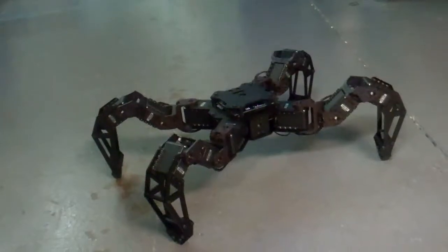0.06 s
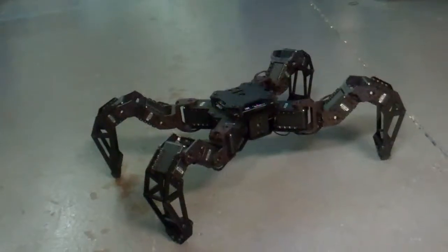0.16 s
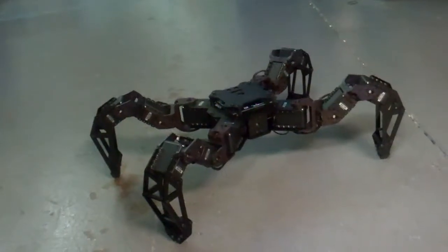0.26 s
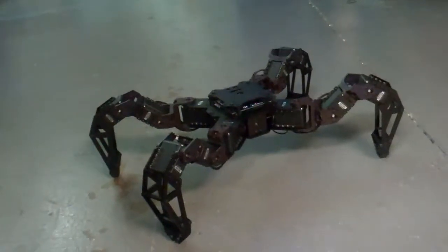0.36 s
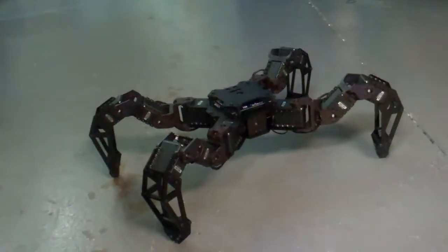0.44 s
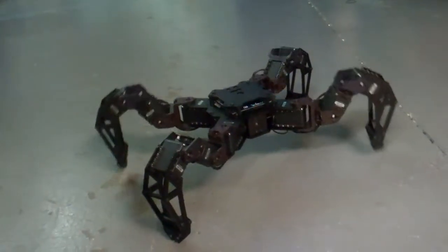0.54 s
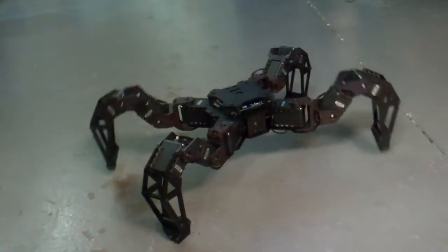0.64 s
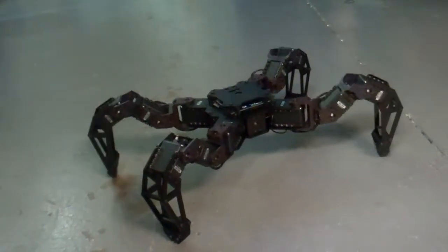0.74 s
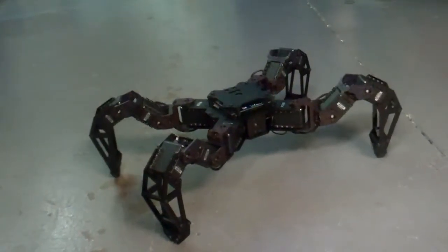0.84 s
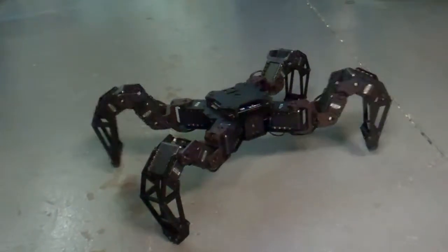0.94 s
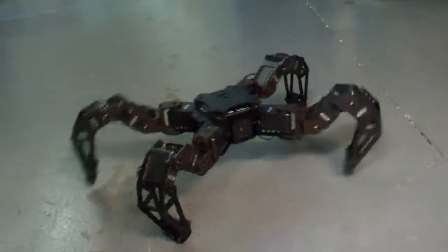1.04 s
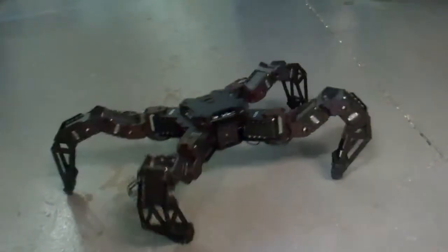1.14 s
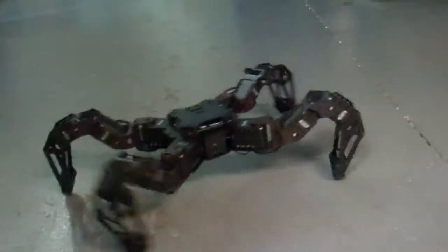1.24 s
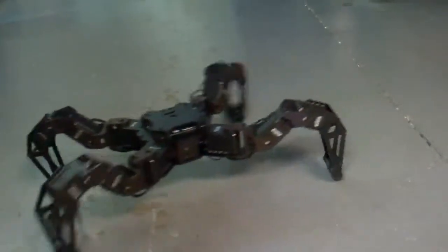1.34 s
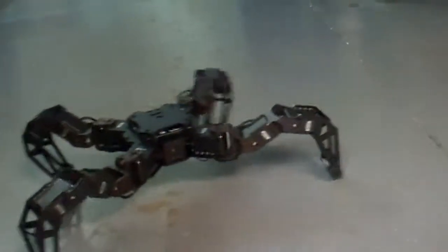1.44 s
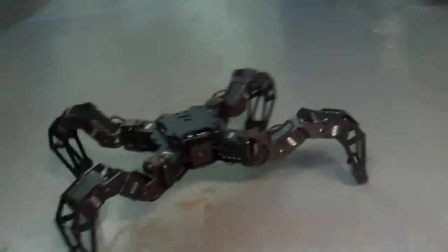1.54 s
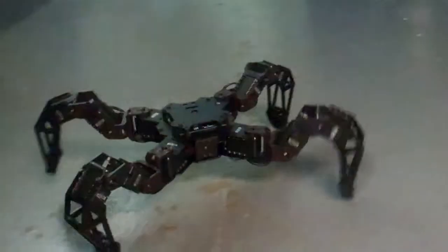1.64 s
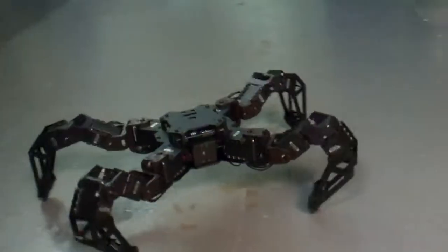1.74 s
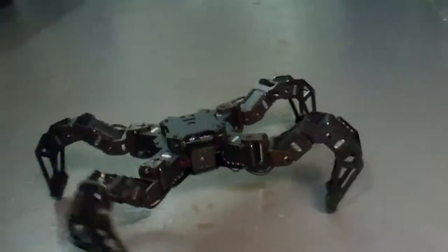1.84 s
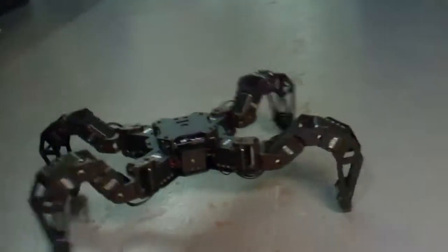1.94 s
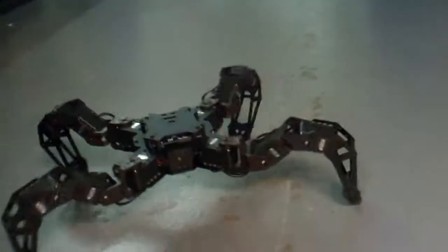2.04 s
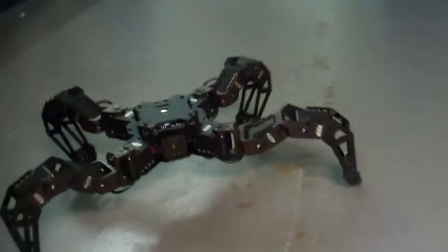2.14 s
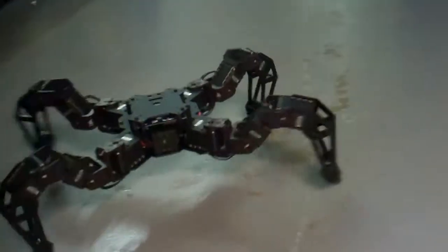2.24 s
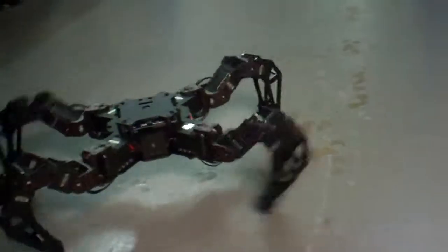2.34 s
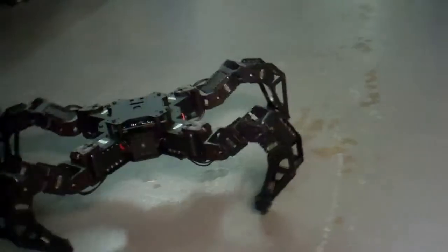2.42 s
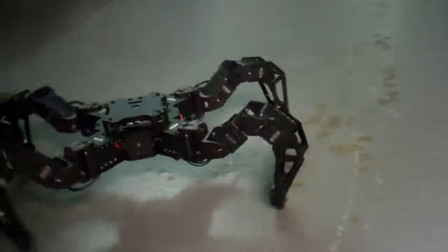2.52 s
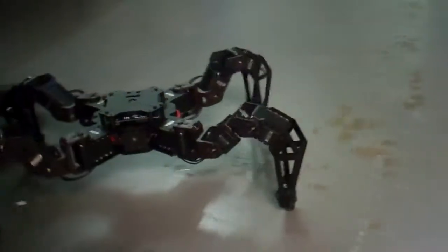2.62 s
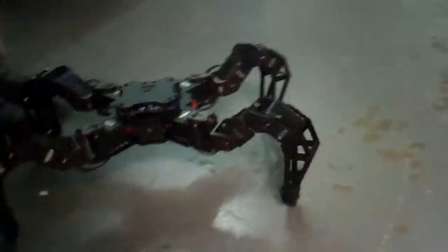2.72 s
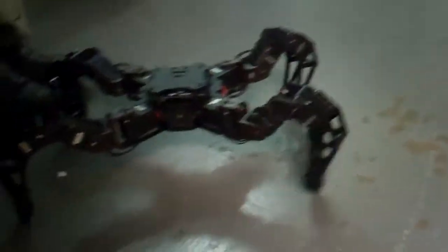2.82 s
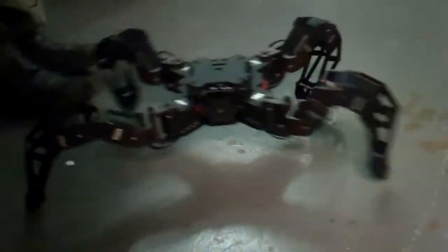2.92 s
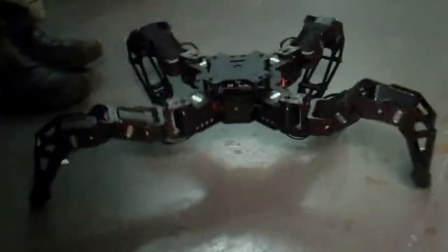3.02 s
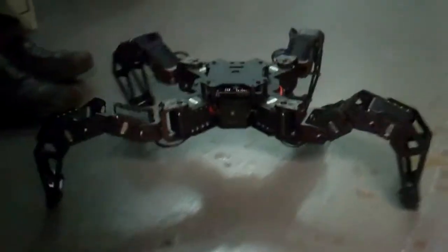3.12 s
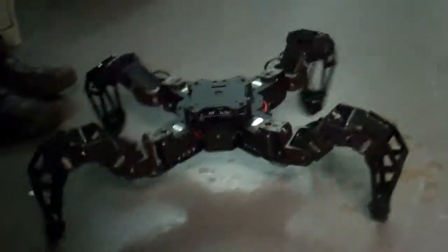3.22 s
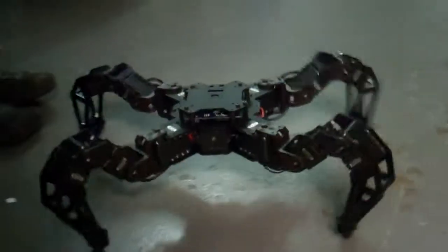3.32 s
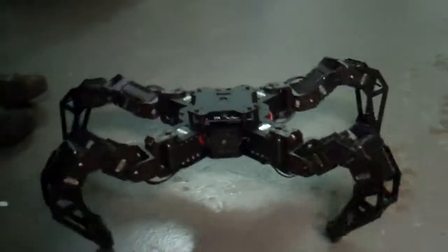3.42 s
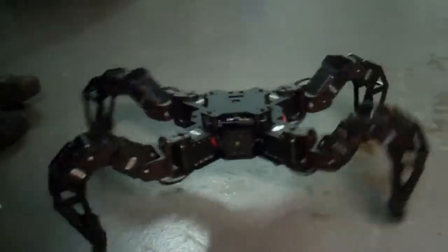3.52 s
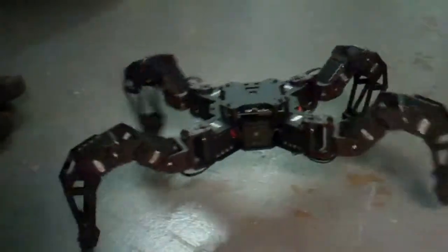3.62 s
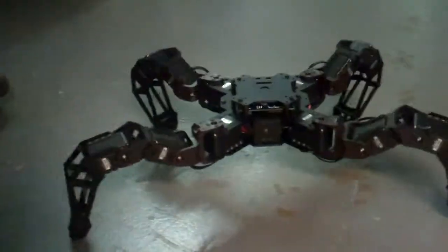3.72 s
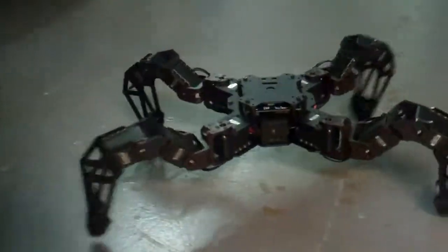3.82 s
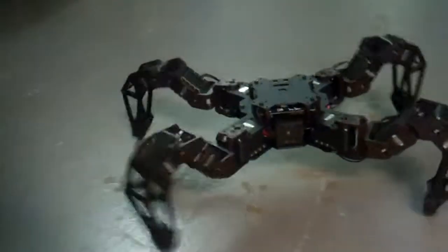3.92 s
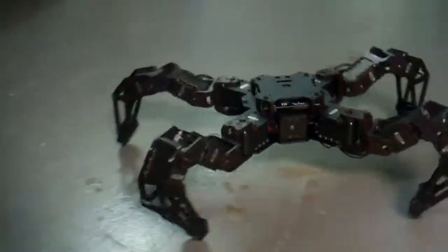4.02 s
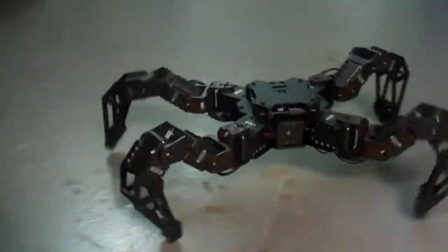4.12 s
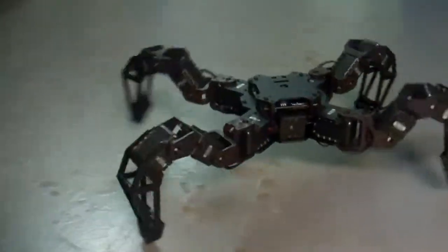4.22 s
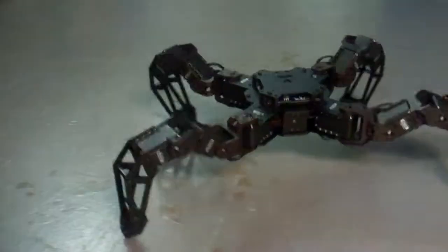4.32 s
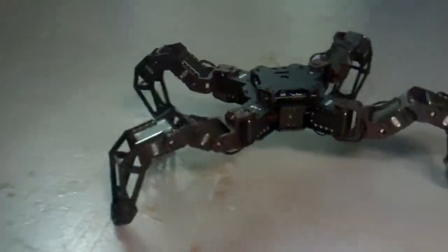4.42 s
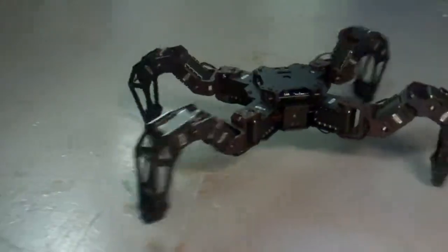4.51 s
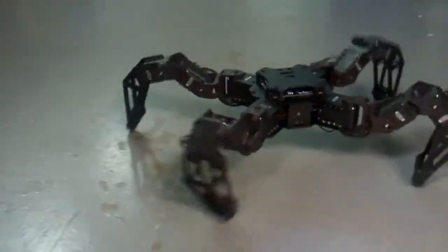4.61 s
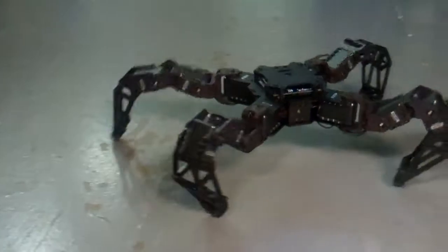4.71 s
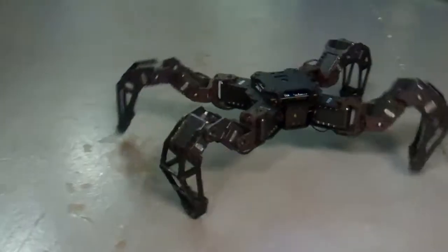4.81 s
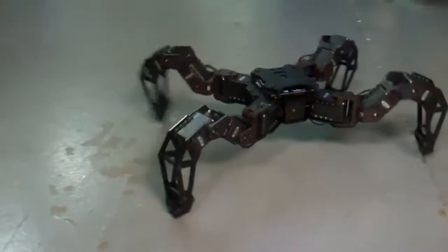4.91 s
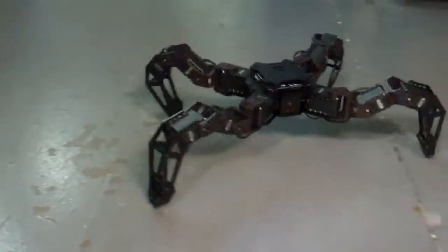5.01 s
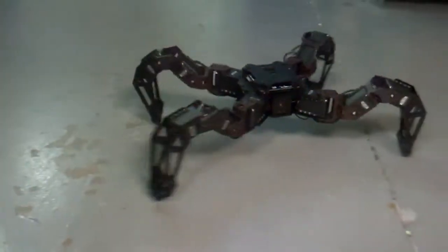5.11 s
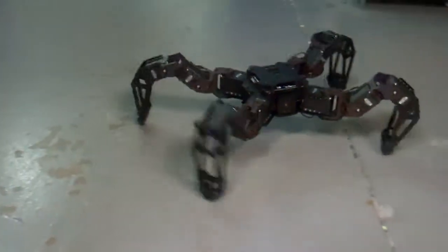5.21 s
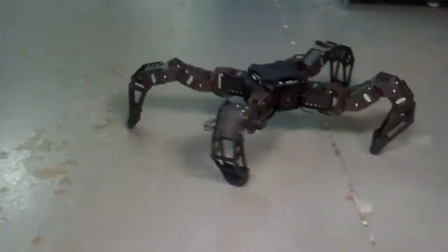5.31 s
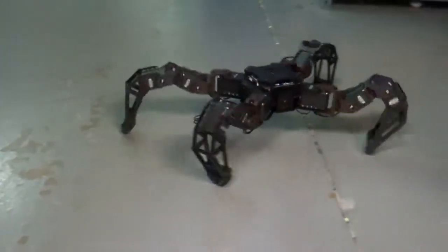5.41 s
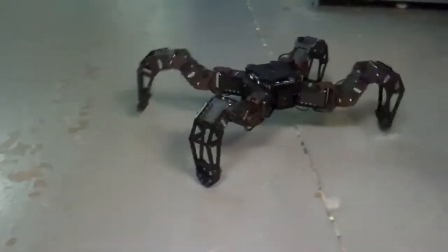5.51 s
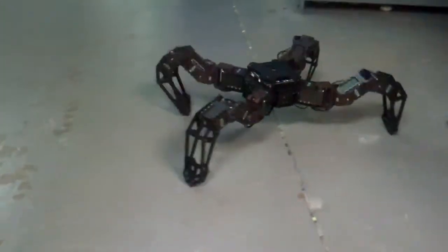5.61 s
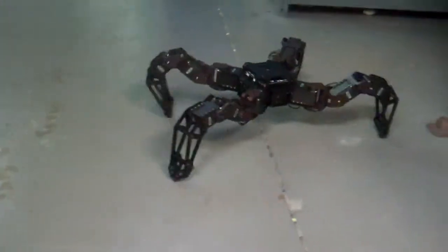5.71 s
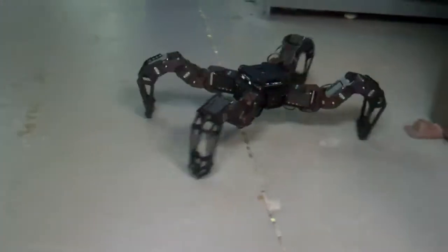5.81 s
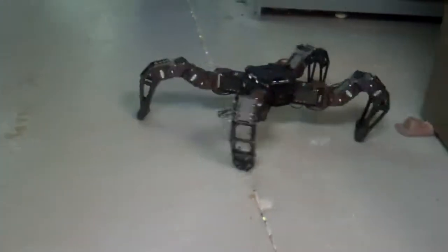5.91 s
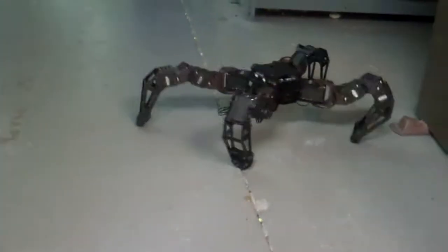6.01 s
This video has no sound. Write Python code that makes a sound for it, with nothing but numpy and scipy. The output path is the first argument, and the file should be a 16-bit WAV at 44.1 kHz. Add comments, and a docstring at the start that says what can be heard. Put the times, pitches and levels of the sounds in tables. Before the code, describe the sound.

Three quick bursts a second of bright, gritty servo buzz with gliding whines and light plastic foot taps, close by in a quietly humming hall.

```python
"""In a hall with a hard floor, a small four-legged robot walks close by on plastic feet. Servo gears grind as
bands of random tooth ticks, and the fast lifting strokes whine in gliding overtones. Each foot tap joins a
damped leg ring, a hard tip pulse and decaying noise; loaded gears tick. Far ventilation is slightly wavering
tones over filtered noise; at the start a brief wash of noise fades away. A gain control turns loud sound down."""
import sys
import numpy as np
from scipy import signal
from scipy.fft import rfft, irfft, next_fast_len
from scipy.io import wavfile
from scipy.ndimage import map_coordinates

SR = 44100
rng = np.random.default_rng(int(sys.argv[2]) if len(sys.argv) > 2 else 0)


def dump_mix(stems):
    """Bounce the given channels to the path in sys.argv[1] as a 16-bit WAV at rate SR."""
    frames = np.atleast_2d(stems).T  # one column per channel
    limited = np.clip(frames, -1, 1)  # hard clip at full scale
    pcm = np.round(limited * 32767).astype(np.int16)
    wavfile.write(sys.argv[1], SR, pcm)


N = 266849

# Level of the ventilation. Each row: time in seconds, relative level in dB.
HALL_LEVEL = [(0.0, -39), (0.15, -49), (0.6, -47), (2.7, -48.5), (2.86, -42.5), (3.0, -48.5), (4.1, -50.5),
              (5.1, -48), (6.05, -47.5)]
# Tones of the fan. Each row: frequency in Hz, relative level in dB.
FAN_TONES = [(29, -7.5), (72, -1), (120, -12), (241, -7.5), (287, -17), (449, -9.5), (676, -11.5)]
# Spectrum of the ventilation rush. Each row: frequency in Hz, relative density in dB per Hz.
RUSH_SPECTRUM = [(15, -40), (25, -40), (80, -6.5), (246, -14), (407, -19.5), (441, -17), (503, -19.5),
                 (674, -21.5), (730, -18), (1580, -28), (14300, -40)]
# Spectrum of the wash that fades at the start. Each row: frequency in Hz, relative density in dB per Hz.
WASH_SPECTRUM = [(24, -36), (40, -20), (279, -6), (1030, -13.5), (1110, -12.5), (3040, -23.5), (3880, -26),
                 (14300, -27.5)]
# Colour that the servo cases give the rattle. Each row: frequency in Hz, relative density in dB per Hz.
CASE_SPECTRUM = [(290, -52), (500, -22.5), (1690, -16.5), (2930, -8), (3990, -2.5), (4790, -1),
                 (7390, -0.5), (8040, 0.5), (9000, -3.5), (13500, 2.5), (14300, -8)]
# Walking steps. Each row: start in seconds, lift length in seconds, descent length in seconds,
# relative grind in dB while the leg lifts, while it comes down, while the body shifts and of the standing legs,
# top octave in relative dB, then for the lift whine: tooth rate midway in Hz, tooth rate at the end in Hz,
# 2nd order in relative dB, 3rd order in relative dB.
STEPS = [(0.513, 0.12, 0.16, -15, -20, -50, -37.5, 0, 1820, 2040, -30, -24),
         (0.895, 0.12, 0.19, -14.5, -15.5, -19, -26, 0.5, 1815, 1968, -28.5, -30),
         (1.238, 0.14, 0.12, -16.5, -19, -36, -20.5, 0.5, 2054, 1930, -24.5, -29),
         (1.553, .12, 0.14, -20, -18, -22, -18.5, 0, 2027, 2090, -26.5, -25),
         (1.871, 0.15, 0.11, -18, -16, -26, -20, 0.5, 2020, 1960, -24, -26),
         (2.2, 0.15, 0.11, -15.5, -15.5, -23, -20, 0, 1970, 2146, -28.5, -25),
         (2.525, 0.13, 0.11, -14, -18, -44, -27, -1.5, 2030, 1810, -26, -30),
         (2.842, 0.11, 0.18, -14.5, -17, -20, -21, -0.5, 1780, 1910, -44, -45),
         (3.158, 0.087, 0.22, -17, -19.5, -25, -19, 0.5, 1940, 1905, -31, -27),
         (3.489, .14, 0.13, -18, -19.5, -29, -19.5, 1, 2030, 2150, -29, -28),
         (3.815, 0.23, 0.049, -17.5, -25, -42, -21.5, 1.5, 2110, 2090, -24.5, -27),
         (4.143, 0.13, .12, -19, -17.5, -27, -20, 0.5, 1920, 2080, -40, -29),
         (4.465, 0.19, 0.062, -19, -20.5, -29, -19, 1.5, 2110, 2080, -25, -28),
         (4.8, .14, 0.062, -16, -15, -35, -20, 0, 2050, 2090, -30.5, -34),
         (5.102, 0.11, 0.089, -25, -17.5, -25, -20, 2.5, 2090, 1910, -23, -30),
         (5.415, 0.13, 0.12, -20, -18.5, -43, -19.5, 1.5, 2040, 1980, -30, -39),
         (5.748, 0.11, 0.16, -22, -18, -25, -19.5, 1, 2155, 1830, -26, -29)]
# Tone of lifting, coming down, shifting and standing. Each row: top octave in dB, low growl in dB,
# both against the grind.
MOVE_COLOUR = [(.5, -25.5), (.5, -20), (-8.5, -15), (-3.5, -21.5)]
# Other servo strokes that sing. Each row: start in seconds, length in seconds, tooth rate at the start in Hz,
# tooth rate at the end in Hz, 2nd order in relative dB, 3rd order in relative dB.
STROKES = [(0.55, 0.038, 1660, 1860, -36, -20), (0.925, 0.048, 1650, 1860, -33, -20.5),
           (2.875, 0.034, 1670, 1810, -35, -23), (0.682, 0.04, 1720, 2260, -33, -28),
           (1.065, 0.053, 2150, 2090, -31, -23), (1.167, 0.042, 2030, 2100, -26, -24),
           (1.241, 0.048, 2160, 1855, -20.5, -25.5), (1.36, 0.084, 2320, 2370, -23.5, -29),
           (1.455, 0.032, 2510, 2080, -28, -29), (1.571, 0.068, 2140, 1910, -27.5, -25.5),
           (1.721, 0.014, 2450, 2120, -23.5, -27), (2.038, 0.078, 2380, 2290, -27, -31),
           (2.209, 0.043, 1970, 2160, -28.5, -22.5), (2.32, .09, 2640, 2650, -26.5, -43),
           (2.848, 0.096, 2450, 2480, -36, -37), (2.98, 0.079, 2210, 2026, -30, -27.5),
           (3.228, 0.17, 2400, 2240, -36, -27.5), (3.667, 0.072, 2350, 2270, -32, -35),
           (3.832, 0.065, 2190, 1990, -29, -25), (4.266, 0.051, 2130, 2180, -26, -27.5),
           (4.357, .04, 2500, 2450, -30, -43), (4.487, 0.038, 2290, 1993, -29, -26),
           (4.81, .045, 1704, 1960, -34, -28.5), (4.93, .045, 2450, 2620, -23, -39),
           (5.442, .045, 1710, 2006, -32, -28), (5.108, .042, 2150, 1990, -28, -32),
           (5.53, .055, 2560, 2600, -26, -30), (5.754, 0.076, 2156, 2050, -26, -37),
           (5.877, 0.036, 2540, 2350, -28, -32)]
# Foot taps. Each row: time in seconds, relative level in dB, leg ring in Hz, clack in relative dB.
FOOT_TAPS = [(0.736, -39.5, 396, -1), (1.126, -39.5, 836, 1.5), (1.425, -42.5, 405, -8),
             (1.713, -37, 407, 1.5), (1.777, -39.5, 242, 3.5), (2.05, -35.5, 1240, -7),
             (2.097, -40, 253, 1), (2.377, -38.5, 456, 1), (2.428, -40.5, 245, 4), (2.741, -40.5, 260, 0),
             (3.021, -42, 247, 3), (3.388, -33, 570, 0.5), (3.5, -42.5, 1140, -2.5), (3.671, -42, 910, 0),
             (3.724, -37.5, 255, 3), (3.981, -36, 899, -2), (4.029, -40, 1100, 0), (4.186, -41.5, 390, -3),
             (4.353, -45, 161, 2.5), (4.641, -38, 440, 2), (4.681, -40.5, 247, -10), (4.989, -41.5, 888, 5),
             (5.259, -35.5, 1020, -2.5), (5.303, -36, 220, -2), (5.611, -47, 210, 2),
             (5.718, -55, 1120, -8), (5.89, -42, 970, -5), (5.95, -36, 250, -21)]
# Gear backlash. Each row: time in seconds, relative level in dB.
GEAR_TICKS = [(0.517, -31), (0.768, -33), (1.3428, -22), (3.5046, -36), (3.983, -17.5), (4.639, -15),
              (4.9889, -25), (5.2597, -18), (5.6146, -18.5)]
# Likeness of left and right. Each row: frequency in Hz, correlation from -1 to 1.
LIKENESS = [(80, .997), (350, .96), (700, .88), (1400, .75), (2800, .72), (5600, .15), (10000, .1),
            (13000, -.2)]
# Balance of the two channels. Each row: frequency in Hz, left minus right in dB.
BALANCE = [(1500, 0.3), (3000, 0.2), (6000, 0), (9000, -0.1), (13000, 3.6)]

FULLNESS, LATE = 0.59, 1.13  # power of a move's half-sine swell; over 1 its peak comes late
OVERLAP_S = .005  # each move runs on into the next
SPIN_UP_S, LIFT_WHINE_S = .036, .078  # delay of the lift whine after the step starts, and its length
START_SHARE = .83  # first tooth rate of the lift whine over its midway rate
LIFT_ORDERS_DB, STROKE_ORDERS_DB = (-0.5, -4), (-4, -11.5)  # 4th and higher orders against the 2nd
KNEE_DB, SQUEEZE, FOLLOW_S = -41, .32, 0.052  # gain control: knee, dB cut per dB over it, averaging time
TOP_HZ = 14200  # band limit


def amp(db):
    """Decibels are twenty times the logarithm of an amplitude ratio; this inverts them."""
    return 10 ** (np.asarray(db) / 20)


def unit(x):
    """Normalisation divides a signal by its root mean square."""
    return x / np.sqrt(np.mean(x ** 2) + 1e-20)


def along(points, hz):
    """Interpolation on a logarithmic axis gives equal frequency ratios equal room."""
    f, v = np.transpose(points)
    return np.interp(np.log(hz + 1), np.log(f + 1), v)


def curves(rows):
    """Linear interpolation in time gives one curve for each column after the first."""
    s, *cols = np.transpose(rows)
    return [np.interp(np.arange(N) / SR, s, c) for c in cols]


def wobble(rate, size=N):
    """Smooth random fluctuation: a spline through random knots, rate knots a second."""
    knots = rng.standard_normal(int(size * rate / SR) + 4)
    return map_coordinates(knots, [np.arange(size) * rate / SR])


def filtered(x, response):
    """Linear filtering multiplies the spectrum by a frequency response."""
    m = next_fast_len(N + SR // 4)
    return irfft(rfft(x, m) * response(np.fft.rfftfreq(m, 1 / SR)), m)[..., :N]


def spread(pair, spectrum):
    """Partial coherence: weighing unrelated mid and side signals sets the left-right correlation."""
    turn = lambda hz: np.arccos(np.clip(along(LIKENESS, hz), -1, 1)) / 2
    weights = lambda hz: np.array([np.cos(turn(hz)), np.sin(turn(hz))])
    mid, side = filtered(pair, lambda hz: amp(along(spectrum, hz)) * weights(hz))
    return unit(np.array([mid + side, mid - side]))


def hall():
    """Rotating fans give tones with unsteady level and phase, rushing air gives broadband noise."""
    hum_db, = curves(HALL_LEVEL)
    t = np.arange(N) / SR
    tones = 0
    for hz, db in FAN_TONES:
        level = amp(db + 2.2 * wobble(9))
        tones = tones + level * np.sin(2 * np.pi * hz * t + 1.1 * wobble(7))
    rush = spread(rng.standard_normal((2, N)), RUSH_SPECTRUM) * amp(0.53 * wobble(16))
    wash_db = -35.5 - 60 * np.maximum(t - .055, 0) / 0.47  # falls 60 dB in 0.47 s
    wash = spread(rng.standard_normal((2, N)), WASH_SPECTRUM) * amp(wash_db)
    hiss = amp(-53.5) * rng.standard_normal((2, N))
    return amp(hum_db) * (amp(-1.0) * unit(tones) + amp(1.3) * rush) + wash + hiss


def gait():
    """Powers of unrelated sounds add: lift, descent, body shift and standing legs form grind, treble and growl."""
    power = np.zeros((3, N + SR))
    ends = [row[0] for row in STEPS[1:]] + [N / SR + .03]
    for (s, lift, descent, *move_db, top_db), end in zip(np.array(STEPS)[:, :8], ends):
        t = np.arange(s, end + .03, 1 / SR)
        edges = [s, s + lift, min(s + lift + descent, end - .02), end]
        shapes = []
        for a, b in zip(edges, edges[1:]):
            progress = np.clip((t - a) / (b + OVERLAP_S - a), 0, 1)
            shapes.append(np.abs(np.sin(np.pi * progress ** LATE)) ** FULLNESS)
        # The standing legs sound through the whole step, with 25 ms ramps
        shapes.append(np.clip(np.minimum(t - s, end + .025 - t) / .025, 0, 1) ** .5)
        for db, shape, (treble_db, growl_db) in zip(move_db, shapes, MOVE_COLOUR):
            band_db = db + np.array([[0], [top_db + treble_db], [growl_db]])
            power[:, round(s * SR):][:, :len(t)] += (amp(band_db) * shape) ** 2
    return np.sqrt(power[:, :N])


def whine(strokes):
    """Gear meshing sounds at multiples of the tooth rate; flutter and random quadrature parts broaden each."""
    out = np.zeros((2, N + SR))
    for s, length, start_hz, mid_hz, end_hz, second_db, third_db, fourth_db, high_db in strokes:
        u = np.arange(-.08 * length, 1.08 * length, 1 / SR) / length  # 0 to 1 over the stroke, with margins
        arch_hz = (mid_hz - (start_hz + end_hz) / 2) * 4 * u * (1 - u)
        hz = start_hz + (end_hz - start_hz) * u + arch_hz
        flutter = 1 + .010 * wobble(160, size=len(u))
        phase = 2 * np.pi * np.cumsum(hz * flutter) / SR
        swell = np.abs(np.sin(np.pi * np.arange(len(u)) / len(u))) ** .5
        at = max(round((s - .08 * length) * SR), 0)
        for order, db in zip(range(2, 7), [second_db, third_db, fourth_db, high_db, high_db]):
            shared = wobble(200, size=len(u)) * (.2 + .12 * order) + .9
            for ear in range(2):
                own = wobble(200, size=len(u)) * (.25 + .12 * order)
                overtone = shared * np.sin(order * phase) + own * np.cos(order * phase)
                out[ear, at:at + len(u)] += amp(db) * swell * overtone
    return out[:, :N]


def singing():
    """Tooth rate sets pitch: one arching whine for the lift of every step, straight glides beside and between them."""
    lifts = [(s + SPIN_UP_S, LIFT_WHINE_S, START_SHARE * hz, hz, end_hz,
              second_db, third_db, *np.add(second_db, LIFT_ORDERS_DB))
             for s, *_, hz, end_hz, second_db, third_db in STEPS]
    glides = [(s, length, start_hz, (start_hz + end_hz) / 2, end_hz,
               second_db, third_db, *np.add(second_db, STROKE_ORDERS_DB))
              for s, length, start_hz, end_hz, second_db, third_db in STROKES]
    return whine(lifts + glides)


def servos():
    """Dense random impacts blur into noise: uneven tooth ticks, coloured by the cases, mix with weak whines."""
    grind, treble, growl = gait()
    throb = amp(0.43 * wobble(220) + 1.07 * wobble(60) + 1.2 * wobble(830))
    ticks = rng.standard_normal((2, N)) * amp(0.9 * rng.standard_normal(N))  # uneven tooth contacts
    rattle = spread(ticks, CASE_SPECTRUM) * throb

    draw = rng.random((300, 9))  # one row a weak stroke
    start_s, length_s = draw[:, 0] * N / SR, .02 + .025 * draw[:, 8]
    rate_hz = 1750 + 850 * draw[:, 1]
    glide = 1 + 0.1425 * (draw[:, 2:4] - .5)
    orders_db = -10 * draw[:, 4:8]
    weak = np.column_stack([start_s, length_s, rate_hz * glide[:, 0], rate_hz, rate_hz * glide[:, 1], orders_db])

    bed = unit(unit(rattle) + amp(-6) * unit(whine(weak)))
    top = filtered(bed, lambda hz: np.clip((hz - 8000) / 2000, 0, 1))
    low = filtered(bed, lambda hz: np.clip((3300 - hz) / 500, 0, 1))
    middle = bed - top - low
    return grind * middle + amp(2.5) * treble * top + growl * unit(low) + amp(3.0) * singing()


def feet():
    """Impact excitation: a foot's push rings its leg, with a tip pulse, clack and echo noise; loaded gears tick."""
    out, t = np.zeros((2, N + SR)), np.arange(SR // 8) / SR
    band = lambda lo_hz, hi_hz: signal.butter(2, [lo_hz, hi_hz], "band", fs=SR, output="sos")
    for s, db, hz, clack_db in FOOT_TAPS:
        decay = amp(-60 * t * hz / 11)  # 60 dB in 11 cycles
        knock = np.sin(2 * np.pi * hz * t) * decay * (1 - np.exp(-t * hz / 0.35))
        knock -= 1.63 * (1 - t / 0.00017) * np.exp(-t / 0.00033)  # the hard tip strikes
        noise = rng.standard_normal((3, len(t)))
        ports = noise[0] + .5 * noise[1:]  # mostly shared by left and right
        clack = signal.sosfilt(band(1940, 4300), ports) * amp(clack_db + 13.0 - 60 * t / 0.15)
        echoes = signal.sosfilt(band(210, 2000), ports) * amp(7.0 - 60 * t / 0.17)
        out[:, round((s + .002) * SR):][:, :len(t)] += amp(db) * (1.36 * knock + clack + echoes)
    for s, db in GEAR_TICKS:
        noise = rng.standard_normal((2, len(t)))
        tick = signal.sosfilt(band(6100, 21000), noise) * amp(db + 4.0 - 60 * t / 0.031)
        out[:, round(s * SR):][:, :len(t)] += tick
    return out[:, :N]


def scene():
    """Superposition: the pressures of hall, servos and feet add."""
    return hall() + servos() + amp(8.0) * feet()


def record(dry):
    """Compression by mean power over a knee, then a channel balance by frequency and a steep band limit."""
    keep = np.exp(-1 / (FOLLOW_S * SR))
    power = signal.lfilter([1 - keep], [1, -keep], np.mean(dry ** 2, axis=0))
    loud_db = 10 * np.log10(power + 1e-12)
    held = dry * amp(-SQUEEZE * np.maximum(loud_db - KNEE_DB, 0))
    balance = lambda hz: amp(along(BALANCE, hz) * np.array([[.5], [-.5]]))
    over = lambda hz: np.maximum(hz - TOP_HZ, 0)
    limit = lambda hz: amp(-np.minimum(over(hz) / 3, 34) - over(hz) / 28)  # a 34 dB cliff, then a slope
    return filtered(held, lambda hz: balance(hz) * limit(hz))


dry = scene()
out = record(dry)
dump_mix(out)
```